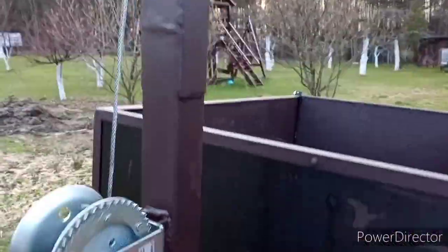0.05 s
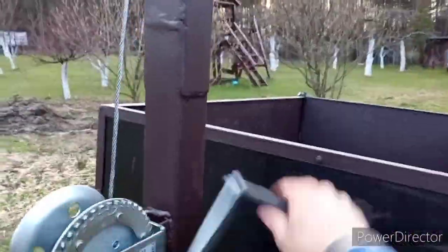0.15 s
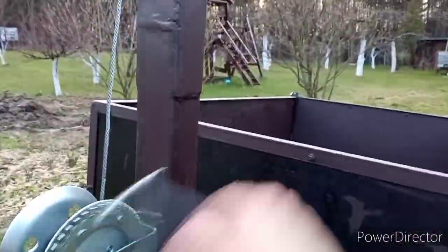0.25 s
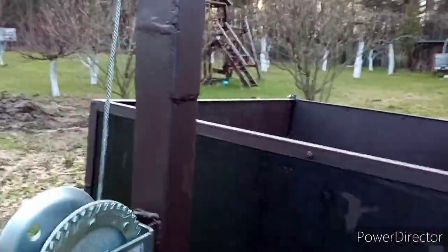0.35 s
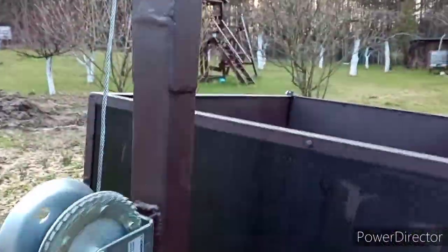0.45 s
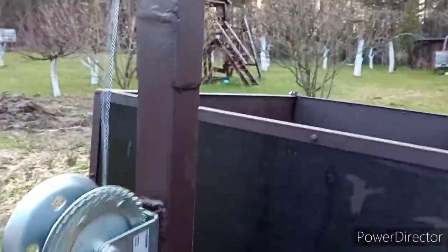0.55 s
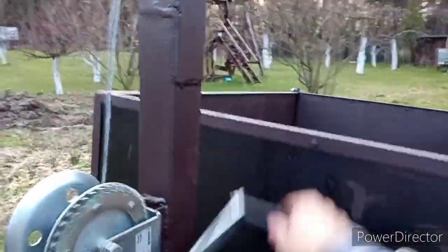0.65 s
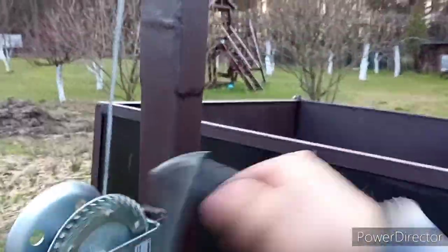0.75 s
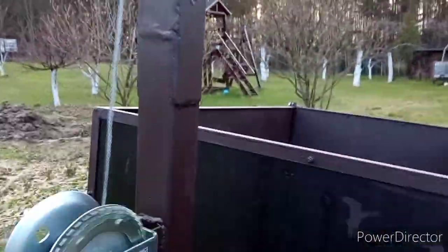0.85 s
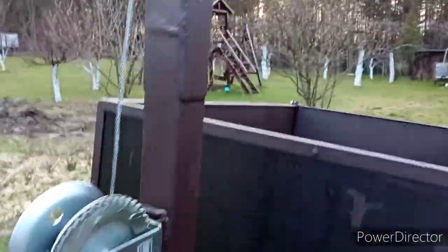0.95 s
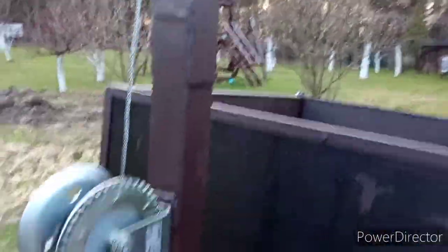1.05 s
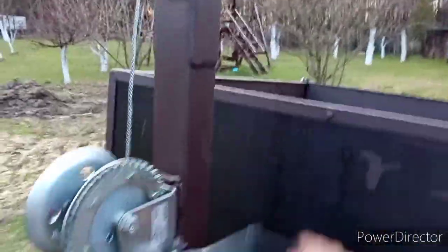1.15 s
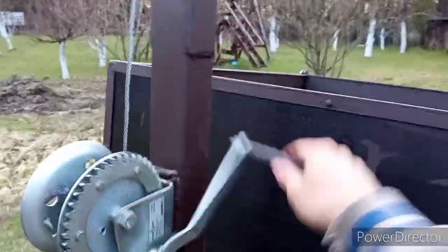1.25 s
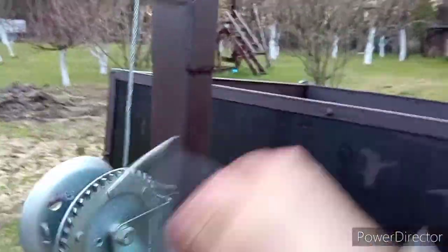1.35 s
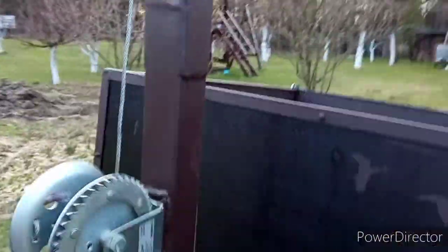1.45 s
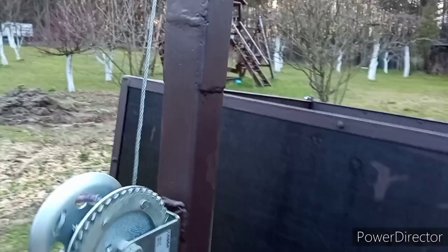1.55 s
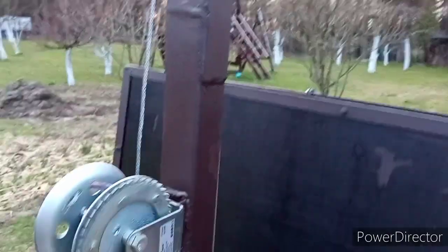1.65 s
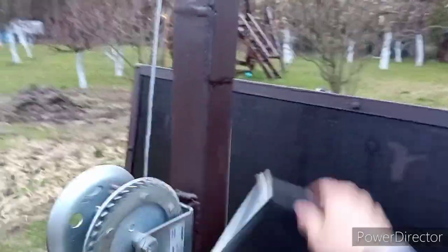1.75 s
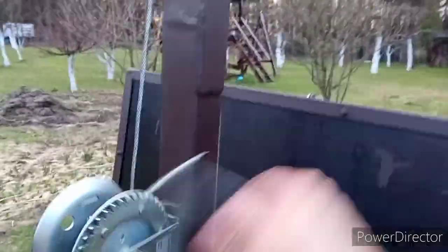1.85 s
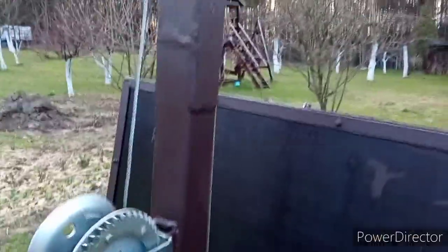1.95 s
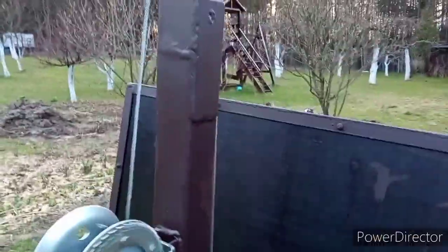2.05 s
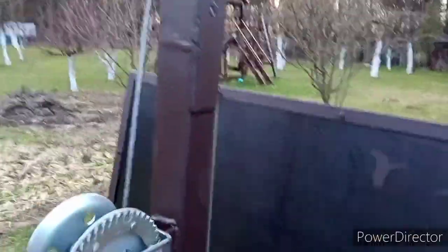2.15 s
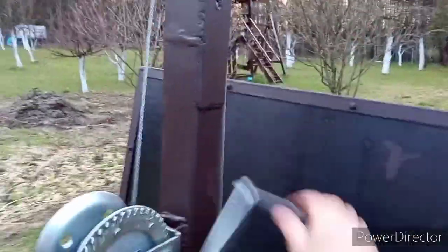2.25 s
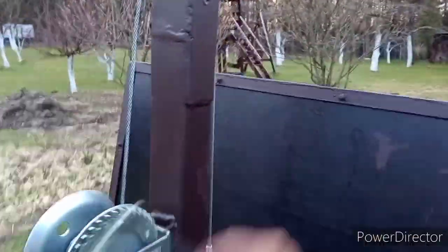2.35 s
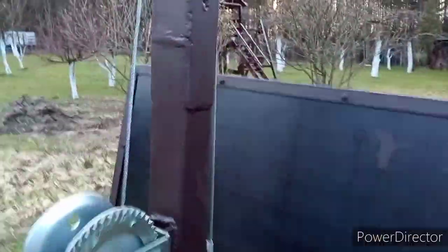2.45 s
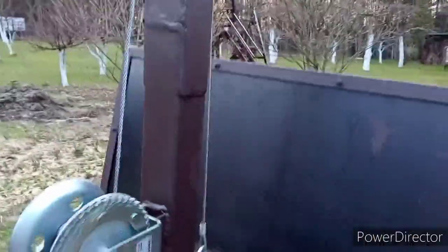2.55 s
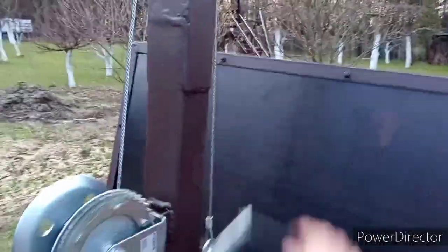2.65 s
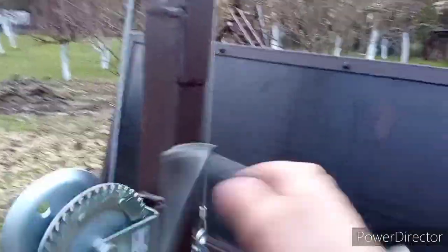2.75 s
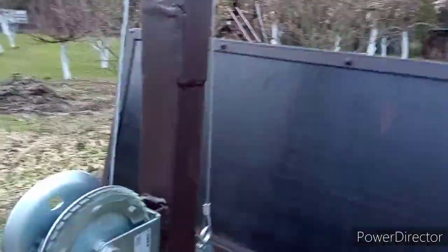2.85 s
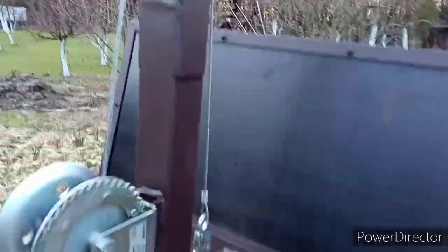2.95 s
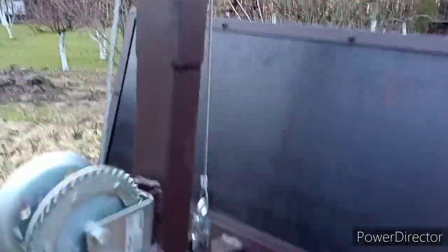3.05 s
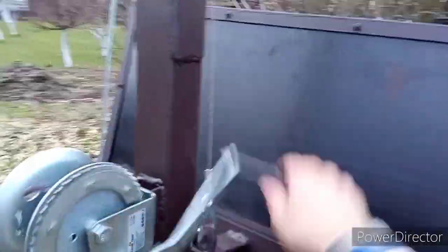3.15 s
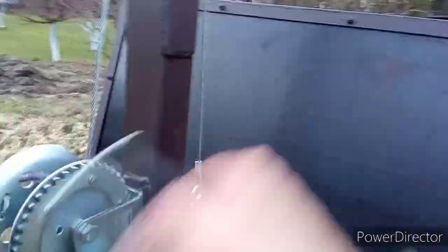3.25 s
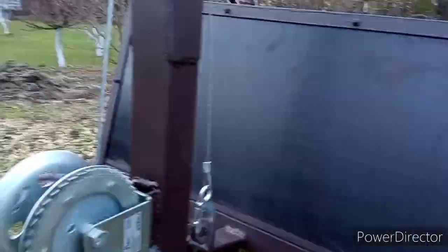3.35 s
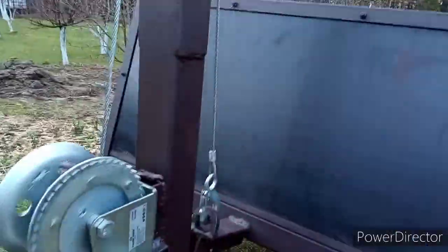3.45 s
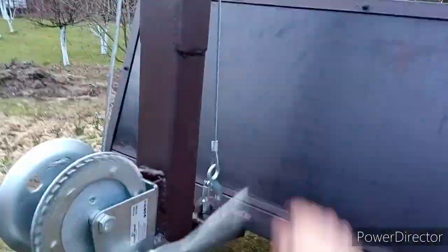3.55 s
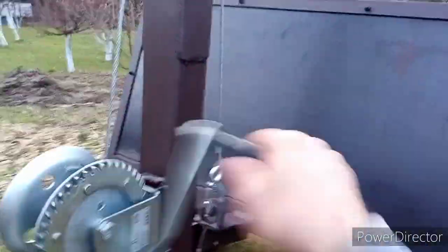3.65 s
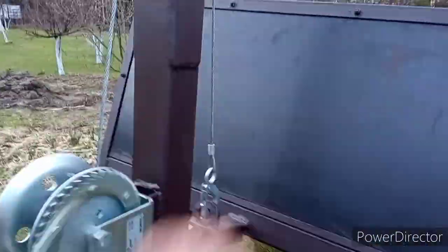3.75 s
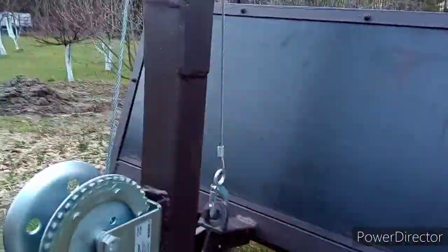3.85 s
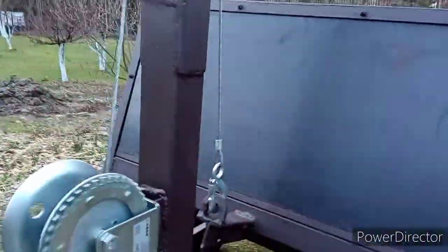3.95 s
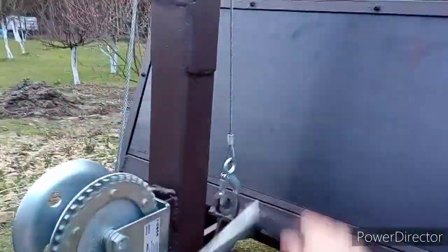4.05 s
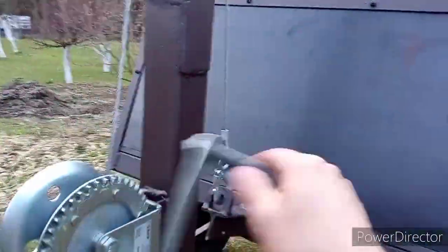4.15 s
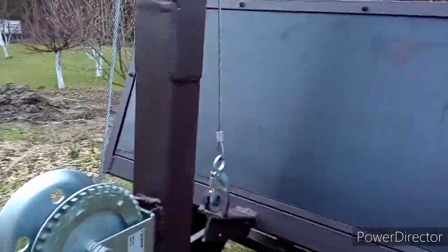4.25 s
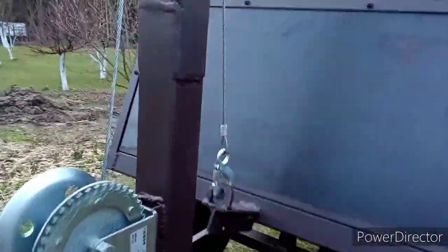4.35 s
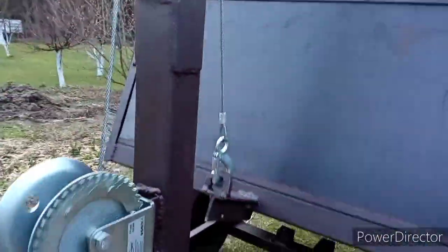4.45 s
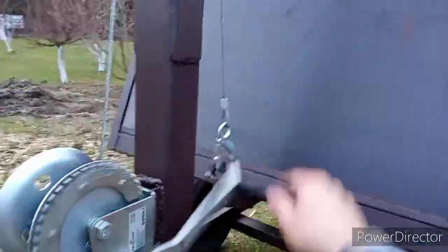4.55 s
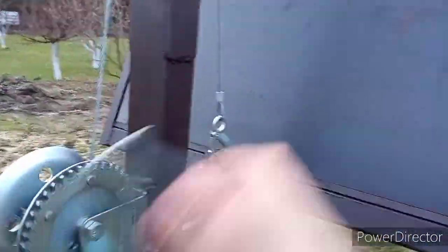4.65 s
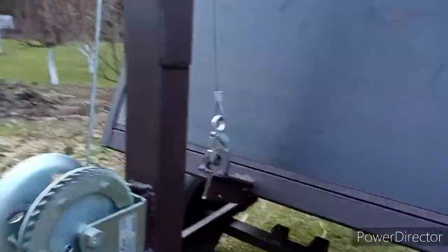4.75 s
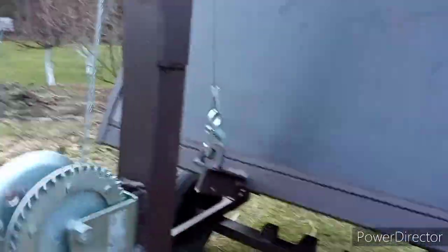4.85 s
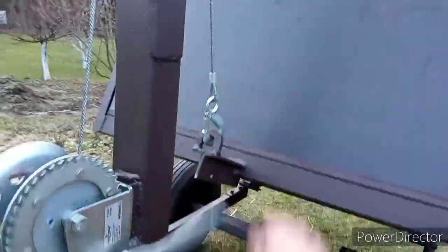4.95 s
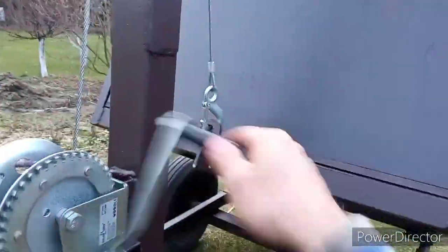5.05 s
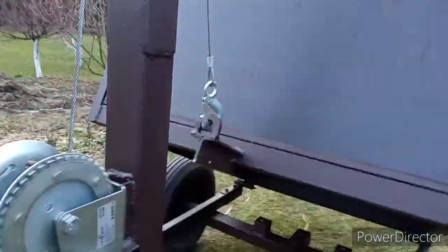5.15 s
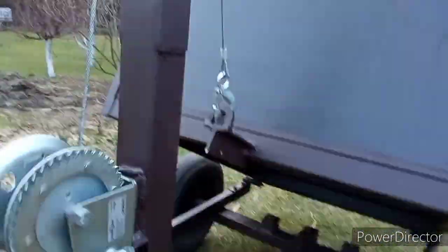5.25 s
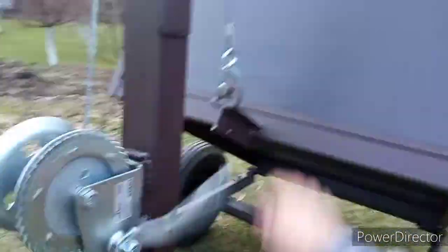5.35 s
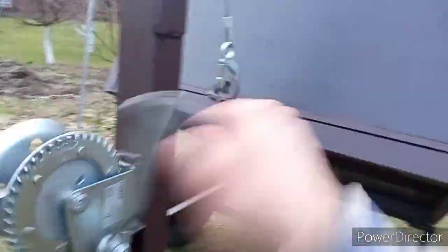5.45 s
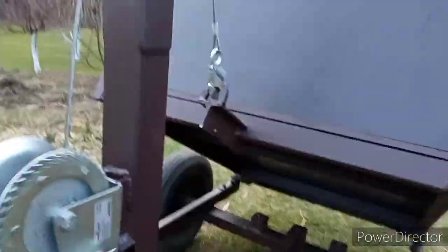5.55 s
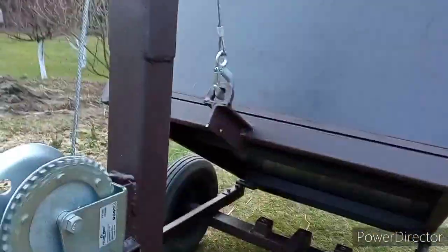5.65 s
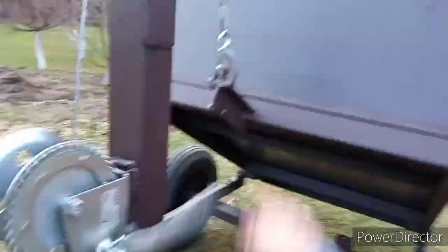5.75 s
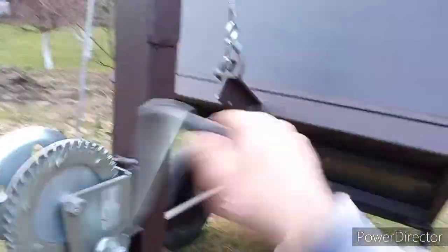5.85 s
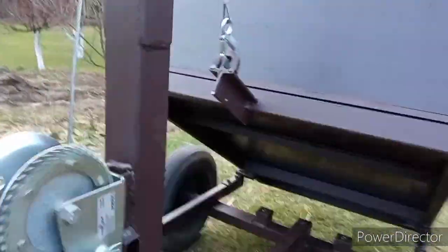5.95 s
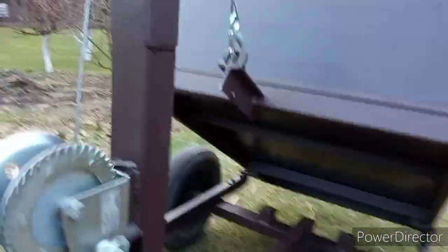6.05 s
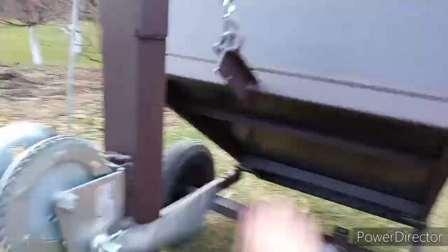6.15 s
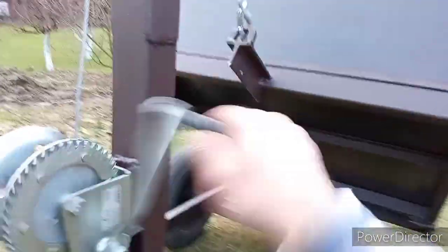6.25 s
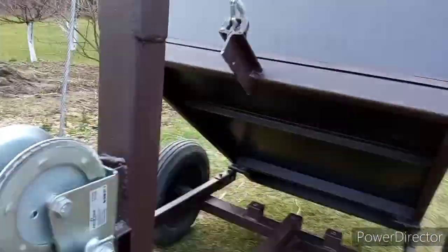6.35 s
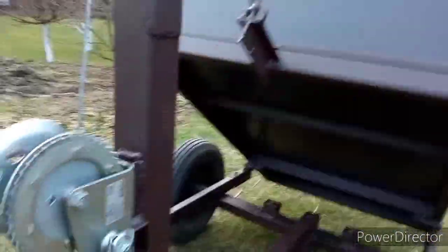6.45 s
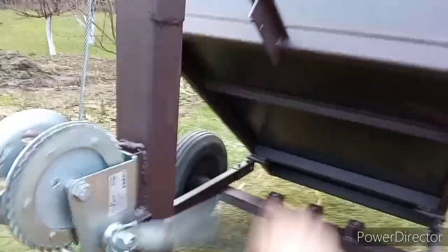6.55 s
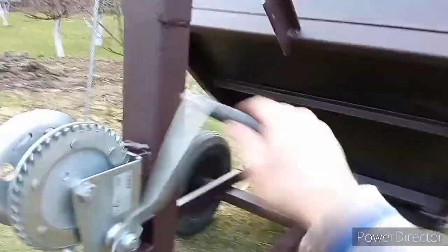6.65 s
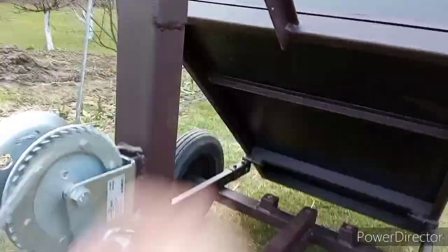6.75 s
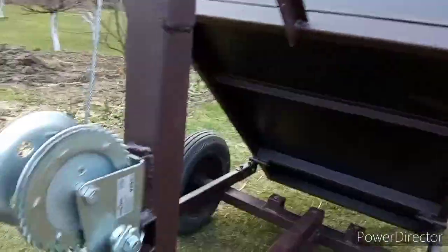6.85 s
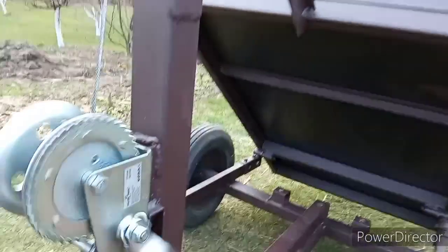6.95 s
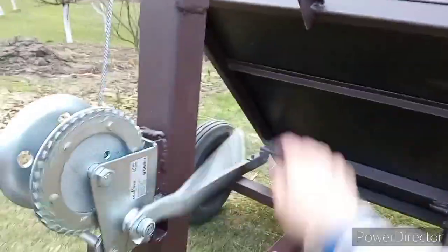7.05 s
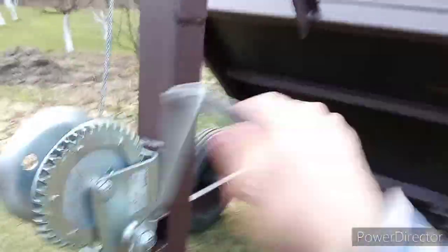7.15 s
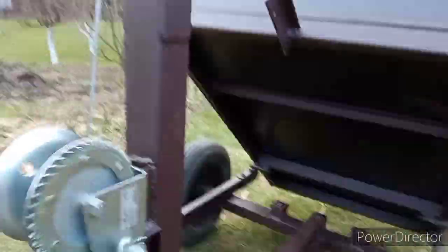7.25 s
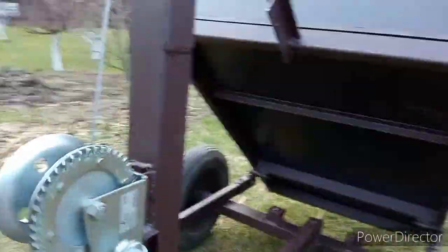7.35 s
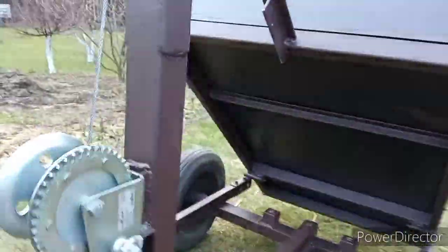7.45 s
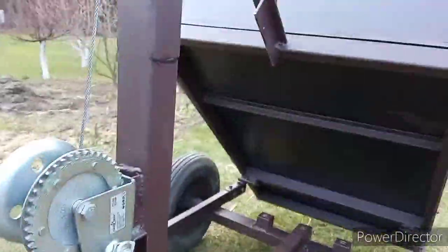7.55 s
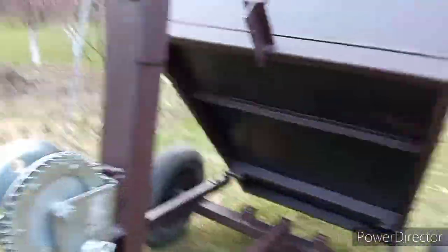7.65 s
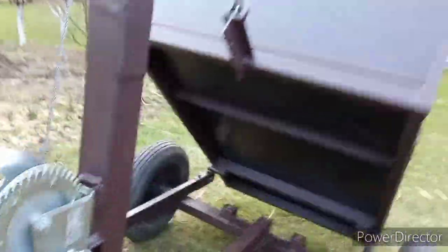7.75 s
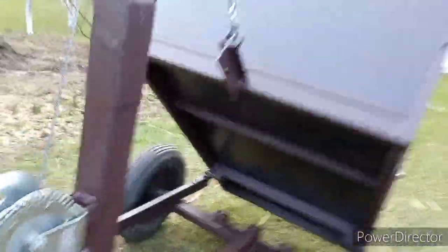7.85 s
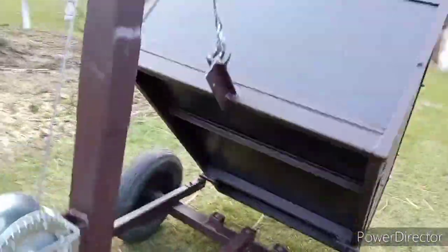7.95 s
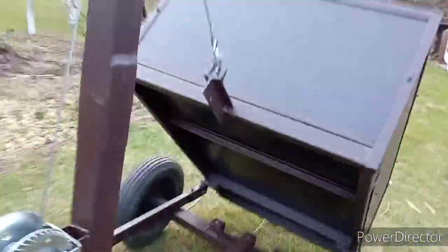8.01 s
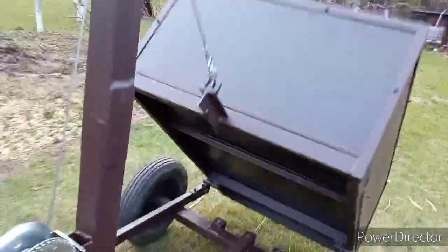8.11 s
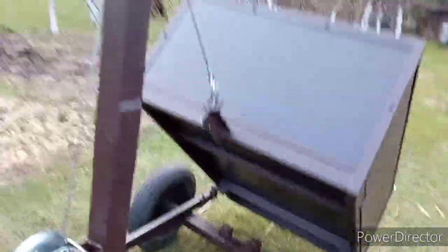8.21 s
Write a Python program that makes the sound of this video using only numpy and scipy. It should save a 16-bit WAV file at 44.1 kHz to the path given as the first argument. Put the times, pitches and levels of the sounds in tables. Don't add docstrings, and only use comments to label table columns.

```python
import sys
import numpy as np
from scipy import signal
from scipy.io import wavfile
from scipy.ndimage import uniform_filter1d

SR = 44100
rng = np.random.default_rng(int(sys.argv[2]) if len(sys.argv) > 2 else 0)


def inscribe(sig):
    pcm = np.round(np.clip(np.atleast_2d(sig).T, -1, 1) * 32767)
    wavfile.write(sys.argv[1], SR, pcm.astype(np.int16))


def elevation(decibels):
    levels = np.asarray(decibels, float)
    return 10 ** (levels / 20)


N = 365148
HAND_S, HAND_T60_S = 7.82, .15


def ratchet():
    # start_s, turned (0-1), nearness_db
    facing = [
        (0, 0, -1.5),
        (.8, 0.2, 2.5),
        (1.999, 0.2, 1.1),
        (3.002, 0.4, -1),
        (4.498, 0.4, 1.5),
        (5.2, .95, -0.5),
        (6.002, 0.6, 1.5),
        (6.698, .95, 5.5),
        (7.5, 1, 7.5),
    ]
    gear_hz = [592, 759, 1088, 1168, 1308, 1680, 2270, 2500, 2750, 2929, 3100, 3403, 3548, 3650, 3735, 3810,
               3870, 3945, 4080, 4430, 4562, 4770, 4945, 5560, 6170, 6630, 7000]
    gear_db = [-20.5, -14.5, -18.5, -21, -22.5, -35, -20, -19.5, -3, -20.5, -16, -8, -5.5, -4.5, -2, -5.5,
               -8.5, -11.5, -16, -9.5, -12, -1, 0, -16, -10, -11.5, -11]
    gear_t60_s = [0.22, 0.14, 0.34, 0.33, 0.9, 0.5, 0.19, 0.16, 0.028, .25, 0.34, 0.042, 0.11, 0.077, 0.067,
                  0.11, 0.063, .12, 0.1596, 0.05, 0.11, 0.01, 0.04, 0.082, 0.058, 0.017, 0.031]
    # pitch_hz, t60_s
    post_modes = [(1438, .2), (1539, .8), (1785, .15), (1920, .13), (2275, .17), (3735, .13)]
    # level_db at first, turn_db gained by the turn
    post_db = [(-33, -5.5), (-36, -10.5), (-29.5, -27.5), (-38.5, 2.5), (-49.5, 9), (-27.5, -10.5)]
    # pitch_hz, level_db per Hz
    small_modes = [(150, -15), (400, -24.5), (800, -7), (1500, -11.5), (2500, -11), (3700, -6.5),
                   (4800, -1), (5500, -15.5), (6300, -5), (7700, -12), (9000, -4)]
    # pitch_hz, t60_s
    crack_t60_s = [(300, 0.011), (2000, 0.066), (4500, 0.024), (8000, 0.019)]
    brighter_db = 2.5
    body_follows = 0.36

    s, peak_db, thump_db = drops()
    times, turns, nearness = np.transpose(facing)
    turned = np.interp(s, times, turns)
    near_db = np.interp(s, times, nearness)

    def db_at(hz):
        return colour(hz, peak_db, brighter_db * turned, body_follows * near_db)

    gear = 0
    for hz, db, t60 in zip(gear_hz, gear_db, gear_t60_s):
        gear = gear + struck(s, db_at(hz) + db - 13, hz, min(t60, 480 / hz), 0.32, 1.33)

    post = 0
    for (hz, t60), (db, turn_db) in zip(post_modes, post_db):
        life_db = 7.5 - 3.1 * np.log2(t60 / 0.12)
        blow_db = db + turn_db * turned + near_db * (hz < 3000) + life_db
        post = post + struck(s, blow_db, hz, t60, 0.44, 1)

    crack = 0
    for hz in np.linspace(300, 8200, 100) + rng.uniform(-35, 35, 100):
        t60 = at_hz(crack_t60_s, hz) * rng.uniform(0.6, 0.8)
        crack = crack + struck(s, db_at(hz) + at_hz(small_modes, hz) - 14.0, hz, t60, 0.58, 1)

    loose = elevation(-6) * clatter(s, db_at, small_modes, 1.17, 0.00027, 0.0021, -8)
    return gear + post * hand_damping() + crack + loose + thump(s + 0.001614, thump_db + 1.0)


def drops():
    # start_s, first_tooth, slowing (share, at the stroke's
    strokes = [(0.0077, 0, 0.039, -0.05), (0.4132, 8, 0.094, -0.104), (0.8861, 18, -0.002, -0.168),
               (1.0313, 21, -0.122, -0.119), (1.2031, 24, 0.056, 0.057), (1.5078, 30, -0.012, -0.126),
               (1.6945, 34, 0.098, 0.075), (1.8844, 38, 0.009, 0.012), (2.279, 47, 0.021, -0.032),
               (2.5594, 54, -0.058, -0.044), (2.7682, 59, 0.035, -0.077), (3.0997, 67, -0.033, 0.023),
               (3.4378, 75, -0.044, -0.024), (3.9243, 87, -0.154, 0.027), (4.0917, 91, 0.034, -0.005),
               (4.4466, 99, -0.004, -0.097), (4.6519, 104, -0.071, 0.08), (4.8081, 108, -0.038, -0.092),
               (5.1712, 117, 0.116, -0.146), (5.2868, 120, -0.053, -0.002), (5.7625, 133, -0.004, -0.097),
               (6.0221, 140, -0.007, 0.14), (6.1674, 144, -0.035, 0.007), (6.4258, 151, 0.005, -0.131),
               (6.6536, 157, -0.108, -0.117), (6.9051, 163, 0.075, -0.318), (7.072, 167, -0.26, 0.046),
               (7.202, 170, 0.038, 0.063), (7.3363, 173, -0.266, 0.298), (7.4993, 176, 0.0, 0.0)]
    teeth_late = [-0.004, -0.078, -0.081, -0.043, -0.016, 0.059, 0.077, 0.038, 0.002, 0.016, 0.034]
    # start_s, thump_db
    jolts = [(0.461, -22), (0.656, -23.5), (1.031, -20.5), (1.259, -24.5), (1.413, -24.5), (2.148, -26),
             (2.188, -28), (2.32, -29.5), (2.521, -27), (2.812, -26), (2.983, -30.5), (3.064, -25),
             (3.394, -25.0), (3.438, -23.5), (3.514, -24.5), (3.961, -19), (3.998, -28), (4.139, -23.0),
             (4.275, -28.5), (4.318, -26.0), (5.092, -18), (5.463, -22.5), (5.834, -28), (5.915, -17.5),
             (6.062, -20.5), (6.276, -22.5), (6.689, -28.5), (6.946, -25), (6.993, -21.0), (7.108, -27.5)]
    # start_s, end_s, level_db
    slack = [
        (.78, .95, -8),
        (4.58, 4.98, -3.5),
        (7.18, 7.45, -16),
    ]
    pawl_db, fade_db_per_s, pawl_spread_db, pawl_late_s = -7, 0.28, 0.79, .0001
    usual_thump_db, thump_spread_db = -30, 5.5

    start_s, first, slowing, hurry = np.transpose(strokes)
    tooth = np.arange(int(first[-1]) + 1)
    angle = tooth + np.array(teeth_late)[tooth % len(teeth_late)]
    k = np.minimum(np.searchsorted(first, tooth, "right") - 1, len(first) - 2)
    begin = angle[first[k].astype(int)]
    end = angle[first[k + 1].astype(int)]
    u = (angle - begin) / (end - begin)
    bend = u * (1 - u) * (slowing[k] + hurry[k] * (1 - 2 * u))
    s = start_s[k] + np.diff(start_s)[k] * (u + bend)

    peak_db = pawl_db - fade_db_per_s * s + pawl_spread_db * rng.standard_normal(len(s))
    thump_db = usual_thump_db - thump_spread_db * rng.exponential(1, len(s))
    for slack_start, slack_end, db in slack:
        thump_db += db * ((s > slack_start) & (s < slack_end))
    jolt_s, jolt_db = np.transpose(jolts)
    thump_db[np.abs(s[:, None] - jolt_s).argmin(axis=0)] = jolt_db
    return s + pawl_late_s, peak_db, thump_db


def colour(hz, peak_db, bright_db, body_db):
    body = np.interp(hz, [1800, 3000], [1, 0])
    edge = np.interp(hz, [5000, 6200], [0, 1])
    return peak_db + body * (body_db - np.mean(body_db)) + edge * (bright_db - np.mean(bright_db))


def struck(s, db, hz, t60, spread, wander_db):
    lag_s = rng.uniform(0, .0034)
    bounce_s = rng.uniform(.002, .011, len(s))
    chance = rng.standard_normal((len(s), 3))
    wander = uniform_filter1d(chance[:, 2], size=12) * np.sqrt(12)
    height = elevation(db + wander_db * wander) * rng.choice([-1, 1])
    blows = train(s + lag_s, height * (1 + spread * chance[:, 0]))
    bounces = train(s + bounce_s, height * spread * 0.81 * chance[:, 1])
    return ring(blows + bounces, hz, t60)


def clatter(s, db_at, spectrum, slow, rise_s, bounce_s, bounce_db):
    # pitch_hz, t60_s
    clatter_t60_s = [(300, 0.017), (1200, 0.33), (3000, 0.23), (4300, 0.097), (5300, 0.077), (8000, 0.067)]
    out = 0
    swell = np.exp(-1 / (rise_s * SR))
    for hz, band in noise_bands():
        power = elevation(2 * (db_at(hz) + at_hz(spectrum, hz) + rng.normal(0, 2.206, len(s))))
        hits = train(s, power) + train(s + bounce_s, power * elevation(2 * bounce_db))
        fall = elevation(-2 * 60 / (slow * at_hz(clatter_t60_s, hz) * SR))
        dying = signal.lfilter([1], [1, -fall], hits)
        out = out + band * np.sqrt(signal.lfilter([1 - swell], [1, -swell], dying))
    return out


def thump(s, db):
    clicks = train(s, elevation(db) * rng.choice([-1, 1], len(s)))
    soft = np.exp(-2 * np.pi * 480 / SR)
    push = signal.lfilter([(1 - soft) ** 2], [1, -2 * soft, soft * soft], clicks) * 110
    return push + elevation(-7.0) * ring(clicks, 150, 0.02)


def hand_damping():
    return elevation(-60 * np.maximum(np.arange(N) / SR - HAND_S, 0) / HAND_T60_S)


def handle():
    # start_s, peak_db, bright_db, body_db
    rattle = [(7.553, -14.5, 1, -16), (7.642, -30, -9, -16), (7.6664, -29.5, -15, -18),
              (7.698, -28.5, -24, -32), (7.751, -14, -19, -27), (7.7977, -22.5, -29, -39.5),
              (7.817, -26, -9.5, -54), (7.8268, -18.5, -20, -18.5), (7.838, -26.5, -5.5, -39),
              (7.8514, -26, -9.5, -15), (7.877, -20.5, -23.5, -29), (7.9186, -23, -4, -18.5),
              (7.9533, -30, -11.5, -19), (7.9796, -17.5, -14, -28), (8.1776, -52, -23, -8.5),
              (8.2297, -46, -29, -18)]
    # start_s, pitch_hz, level_db, t60_s
    last_rings = [(7.499, 1539, -30.5, 0.99), (7.5, 2280, -30.5, 0.44), (7.498, 1770, -29.5, 0.47),
                  (7.552, 7140, -49, 0.13), (7.823, 218.6, -32, 0.2), (7.823, 395, -38.5, 0.36),
                  (7.822, 827, -32.5, 0.1), (7.822, 1620, -31, 0.1), (7.917, 6420, -26, 0.031),
                  (7.918, 6950, -46, 0.15), (7.978, 2900, -58, 0.89), (7.979, 4866, -75, 0.85)]
    # pitch_hz, level_db per Hz
    tick_spectrum = [(140, -28), (230, 11), (400, -11.5), (1200, -18.5),
                     (2500, -6.5), (5000, -3.0), (7000, -25.5), (8200, -22)]
    s, peak_db, bright_db, body_db = np.transpose(rattle)

    def db_at(hz):
        return colour(hz, peak_db, bright_db, body_db)

    stilled = hand_damping()
    rings = 0
    for at, hz, db, t60 in last_rings:
        damping = stilled if at < HAND_S - .1 else 1
        rings = rings + ring(train([at], [elevation(db)]), hz, t60) * damping
    ticks = elevation(0.5) * clatter(s - .001, db_at, tick_spectrum, 0.49, 0.00032, 0.005, -10.5)
    return signal.sosfilt(signal.butter(3, 170, "high", fs=SR, output="sos"), ticks + rings)


def bearing():
    # start_s, end_s, pitch_hz, level_db
    squeaks = [
        (.285, 0.316, 5680, -44),
        (1.341, 1.411, 5660, -30),
        (6.749, 6.839, 5580, -31.5),
    ]
    out = np.zeros(N)
    for start, end, hz, db in squeaks:
        i = np.arange(int(start * SR), int(end * SR))
        wobble = uniform_filter1d(rng.standard_normal(4000), size=250)[:len(i)] * 16
        shape = np.sin(np.pi * np.linspace(0, .999, len(i)) ** 1.6) ** 0.89
        phase = 2 * np.pi * np.cumsum(hz + 25 * wobble) / SR
        out[i] += elevation(db + 3.0 + 3.4 * wobble) * shape * np.sin(phase)
    return out


def garden():
    # pitch_hz, level_db per Hz
    air_spectrum = [(30, -19.5), (60, -19.5), (200, -4), (500, -3), (1500, -0.5), (3500, -12),
                    (6000, -17.5), (8000, -26)]
    garden_db, stop_s, sink_db_per_s = -38.5, 7.54, 30
    rub_s, rub_db, rub_width_s = 7.84, 5, 0.016
    shuts_s, shut_db_per_s, opens_s, open_db_per_s = 7.94, 110, 8.15, 119.5

    noise = sum(elevation(at_hz(air_spectrum, hz)) * band for hz, band in noise_bands())
    t = np.arange(N) / SR
    sink_db = sink_db_per_s * np.clip(t - stop_s, 0, shuts_s - stop_s)
    cloth_db = rub_db * np.exp(-((t - rub_s) / rub_width_s) ** 2)
    shut_db = shut_db_per_s * np.clip(t - shuts_s, 0, opens_s - shuts_s)
    open_db = open_db_per_s * np.maximum(t - opens_s, 0) ** 1.15
    air = elevation(garden_db - sink_db + cloth_db + open_db - shut_db) * noise / noise.std()

    low_band = signal.butter(2, (60, 300), "band", fs=SR, output="sos")
    rumble = signal.sosfilt(low_band, rng.standard_normal(N))
    return air + elevation(-65) * rumble / rumble.std()


def at_hz(points, hz):
    table_hz, values = np.transpose(points)
    return np.interp(np.log(hz), np.log(table_hz), values)


def train(times, heights):
    places = np.clip((np.ravel(times) * SR).astype(int), 0, N - 1)
    return np.bincount(places, np.ravel(heights), N) + 1e-18


def ring(clicks, hz, t60):
    r = elevation(-60 / (t60 * SR))
    w = 2 * np.pi * hz / SR
    return signal.lfilter([0, np.sin(w)], [1, -2 * r * np.cos(w), r * r], clicks)


def noise_bands():
    band_limits_hz = 45 * 2 ** np.arange(0, 7.6, 1 / 3)
    white = rng.standard_normal((2, N))
    for k, (low, high) in enumerate(zip(band_limits_hz, band_limits_hz[1:])):
        band_pass = signal.butter(2, [low, high], "band", fs=SR, output="sos")
        yield np.sqrt(low * high), signal.sosfilt(band_pass, white[k % 2])


def scene():
    return (ratchet() + handle() + bearing() + garden())[None]


def roll_off(x):
    return signal.sosfilt(signal.butter(12, 8550, fs=SR, output="sos"), x)


def record(dry):
    over_db = np.maximum(20 * np.log10(np.abs(dry[0]) + 1e-9) + 7, 0)
    fall = 300 * np.arange(N) / SR
    held = np.maximum.accumulate(over_db + fall) - fall
    ahead = uniform_filter1d(np.append(held[66:], np.zeros(66)), size=132)
    x = dry * elevation(-.7 * ahead)
    x = signal.sosfilt(signal.butter(4, 65, "high", fs=SR, output="sos"), x)
    x = signal.sosfilt(signal.cheby1(9, .5, 7623, fs=SR, output="sos"), x)
    x = x - 0.57 * np.sign(x) * np.maximum(np.abs(x) - .42, 0)
    return roll_off(x)


dry = scene()
out = record(dry)
inscribe(out)
```